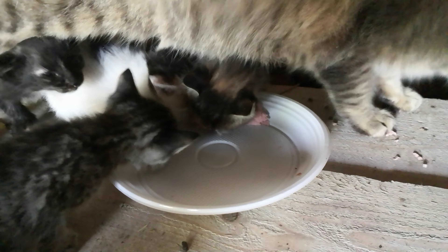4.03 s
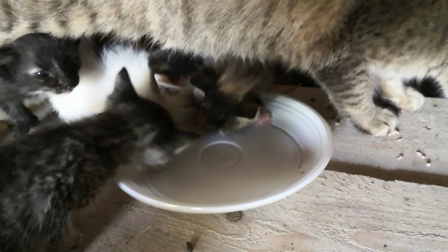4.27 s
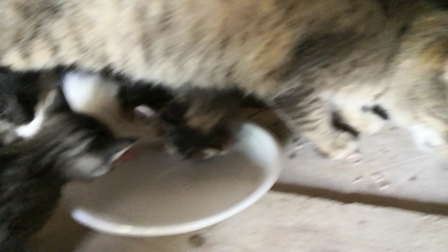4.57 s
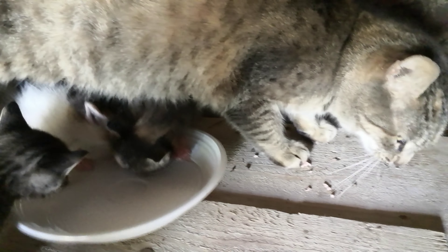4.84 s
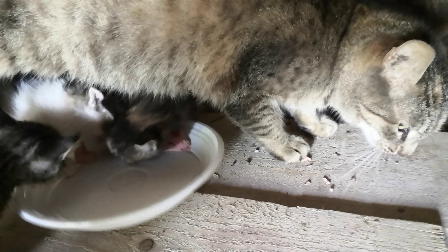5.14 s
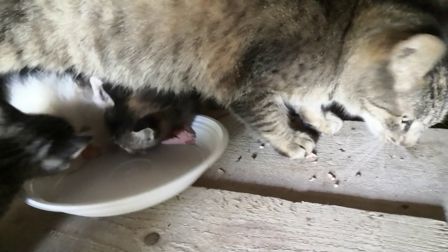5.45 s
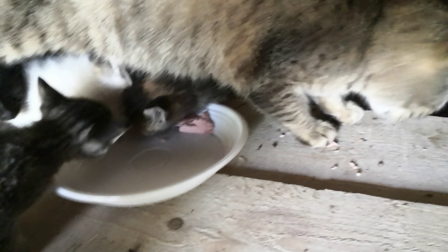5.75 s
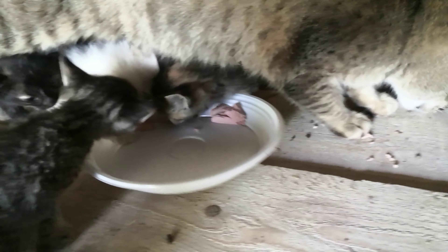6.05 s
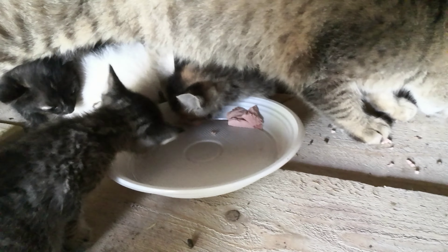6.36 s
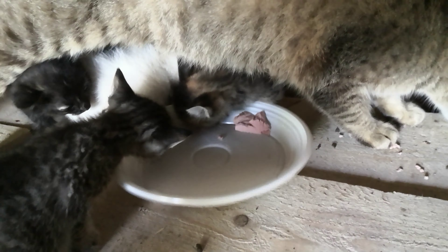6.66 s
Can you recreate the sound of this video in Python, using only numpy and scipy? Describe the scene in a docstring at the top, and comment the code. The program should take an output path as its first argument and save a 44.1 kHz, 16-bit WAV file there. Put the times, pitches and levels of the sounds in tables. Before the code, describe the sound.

Cats eat with wet smacks and clicking bites, then a plastic plate scuffs on wood as a kitten meows twice, loudly then softly.

```python
"""Kittens and their mother feed from a thin plastic plate on a plank floor, close by and a little to the
right. Over faint room noise, lips smack, wet bites click and paws set the boards ringing. A faint tone
hangs for a second. After 4 s the plate is shoved over the wood, knocking and scuffing by friction.
Meanwhile a kitten gives a loud high meow, then a softer, raspy rising one follows: harmonics of the
vocal folds, shaped by throat and mouth. A few last smacks and bites close the scene."""
import sys
import numpy as np
from scipy import signal
from scipy.fft import rfft, irfft, next_fast_len
from scipy.io import wavfile
from scipy.ndimage import uniform_filter1d

SR = 44100
rng = np.random.default_rng(int(sys.argv[2]) if len(sys.argv) > 2 else 0)


def transcribe(u):
    """Save the signal u as a 16-bit wav file named by the first command-line argument.

    u: samples, shape (n,) or (channels, n), limited to [-1, 1]; the rate is SR.
    q: integer samples, one column per channel.
    """
    v = np.clip(np.atleast_2d(u).T, -1, 1)
    q = np.round(v * 32767).astype(np.int16)
    wavfile.write(sys.argv[1], SR, q)


N = 300321
TIME = np.arange(N) / SR

# Levels in the tables are relative: each source's gain is applied afterwards.
# spectrum of the room's still air: f/Hz, level/dB
AIR_SPECTRUM = [(41, -19.5), (70, 3), (113, -7.5), (151, -4.5), (237, -9), (390, -16), (627, -24),
                (1100, -15.5), (1210, -19), (1620, -14), (4180, -22.5), (4790, -26), (6870, -24),
                (7870, -33.5), (15500, -37)]
# its left-right coherence: f/Hz, coherence (clipped to 0-0.999 in use)
AIR_COHERENCE = [(60, 0.89), (180, 0.97), (550, -2.5), (1650, 0.46), (4970, -0.037), (15000, 0.13)]
# its balance, left minus right: f/Hz, level/dB
AIR_BALANCE = [(180, 0.5), (550, 2), (1650, 0), (5000, -1.5), (15000, -1.5)]
# low background rumble, swelling briefly near 4.7 s: t/s, level/dB
RUMBLE_ENVELOPE = [(0.0, -59.5), (4.2, -61), (4.74, -53), (5.1, -58.5), (6.81, -57)]
# spectra of rumble, bite, chewing, plate scuff and vocal rasp: f/Hz, level/dB
RUMBLE_SPECTRUM = [(12, -24.5), (28, -11.5), (40, 2.5), (52, -14), (78, -7), (110, -17.5), (220, -37.5),
                   (1000, -56)]
BITE_SPECTRUM = [(150, -6.5), (600, -23.5), (1150, -21), (1700, 6.5), (2500, 4), (3400, 4), (4500, 6),
                 (6200, 1), (7300, 6.5), (8000, -2.5), (9200, -34.5), (11500, -13.5), (15000, -33.5)]
CHEW_SPECTRUM = [(300, -34), (700, -22), (1200, -14), (1750, -1.5), (2700, 6.5), (3700, -5), (4700, -1),
                 (6300, -9.5), (7400, 2), (8600, -24.5), (11000, -29), (15000, -34)]
SCUFF_SPECTRUM = [(300, -23.5), (600, -36), (1100, -14), (1400, -8), (1700, -1), (2250, 1.5), (3300, -6.5),
                  (4500, -13), (6000, -12), (7600, -9), (8400, -54), (10000, -47.5), (11500, -37.5),
                  (15000, -41)]
RASP_SPECTRUM = [(1500, -22), (4000, -14.5), (4700, -9), (5500, 3), (6100, -1), (7200, 2.5), (8000, -24),
                 (9000, -36.5), (15000, -35)]
# lip and tongue smacks; knocks of the plate on the boards: t/s, peak level/dB, centre f/Hz
LIP_SMACKS = [(0.434, -52, 5000), (0.494, -46, 7300), (0.505, -49, 7600), (1.149, -53, 3100),
              (1.345, -44.5, 3500), (1.8665, -38.5, 4600), (2.276, -39, 3460), (2.531, -37.5, 6960),
              (3.0945, -38.5, 5460), (3.143, -48.5, 4700), (3.1995, -41, 4400), (3.395, -53, 5030),
              (3.312, -42, 2280), (3.485, -43.5, 7100), (3.798, -46.5, 5500), (4.131, -45, 7000),
              (4.1346, -37, 7150), (4.188, -50.5, 7340), (4.266, -49.5, 5530), (4.4014, -44.5, 4540),
              (4.9178, -46.5, 7700), (5.9941, -37.5, 5550), (6.222, -52.5, 7000), (6.2395, -42.5, 4190),
              (6.315, -43.5, 5700), (6.328, -49.5, 6460)]
PLATE_KNOCKS = [(4.2246, -36.5, 1340), (4.303, -45, 740), (4.541, -37, 1520), (5.163, -41.5, 1810),
                (5.252, -49, 2000), (5.881, -47, 1380), (6.047, -52.5, 1198), (6.204, -56, 1740)]
# bites, each a snap and a wet squelch: t/s, snap level/dB, centre f/Hz, squelch level/dB
BITES = [(0.7188, -28.5, 4730, -53.5), (0.807, -50, 3000, -53.5), (0.825, -18, 5000, -46),
         (1.499, -38.5, 3200, -85), (1.5292, -41.5, 3750, -79), (1.5736, -48, 2970, -64),
         (1.608, -60, 3000, -61), (1.706, -38.5, 8500, -57.5), (1.802, -41.5, 2910, -60),
         (1.876, -35, 3000, -55.5), (1.954, -48, 1770, -64.5), (2.1099, -20, 6400, -88),
         (2.1238, -26.5, 6800, -51.5), (2.14, -39, 3040, -64), (2.1857, -41, 2330, -53),
         (2.199, -43, 3000, -56), (2.476, -46, 2600, -65.5), (2.5589, -20.5, 3700, -45),
         (2.573, -29, 1680, -68), (2.61, -33, 5190, -61), (2.807, -43.5, 4820, -68.5),
         (3.895, -40, 3200, -92), (3.94, -60, 3500, -62.5), (4.4255, -44.5, 2320, -57.5),
         (5.8412, -42, 3120, -52.5), (6.7068, -49, 2360, -66)]
# paws landing on the planks: t/s, level/dB
FOOTFALLS = [(0.722, -47), (3.038, -41.5), (3.056, -43.5), (3.24, -61.5), (4.227, -57), (4.302, -48),
             (4.369, -58.5), (4.591, -56), (4.632, -53)]
# normal modes of a plank: f/Hz, level/dB, T60/s
PLANK_MODES = [(133, -7.5, 0.087), (187, -3, 0.18), (243, -3, 0.15), (327, -6.5, 0.11), (390, -10.5, 0.11),
               (567, -26, 0.29), (652, -14.5, 0.037)]
# strokes of chewing, of the plate on wood, of the voice catching: t/s, level/dB, half length/s
CHEW_STROKES = [(1.38, -68.5, 0.081), (2.23, -63.5, 0.034), (3.35, -75.5, 0.1), (6.645, -62, 0.0089)]
PLATE_SCUFFS = [(4.315, -67, 0.052), (4.543, -46, 0.016), (4.6, -53.5, .005), (4.692, -53.5, 0.029),
                (4.838, -47, 0.012), (4.868, -56, 0.011), (4.975, -47.5, 0.0095), (4.997, -47, 0.0055),
                (5.072, -44.5, 0.0069), (5.12, -65, 0.032), (5.33, -61, 0.0094), (5.668, -50.5, 0.0059),
                (5.697, -46.5, 0.0079), (5.81, -43, 0.0092), (6.05, -68.5, 0.017)]
VOICE_RASPS = [(5.471, -54, 0.0065), (5.52, -56, .012), (5.5645, -51, .002), (5.591, -53, 0.0054)]
# fundamental of the loud and of the soft meow: t/s, f/Hz
LOUD_PITCH = [(4.48, 987), (4.497, 903), (4.532, 1162), (4.56, 1213), (4.63, 1247), (4.657, 1175),
              (4.69, 1096), (4.71, 1128), (4.76, 1102), (4.875, 1327), (4.99, 1139), (5.03, 1010)]
SOFT_PITCH = [(5.465, 625), (5.55, 586.6), (5.73, 728.6), (5.825, 803), (5.87, 764), (5.965, 832),
              (6.015, 904), (6.08, 926), (6.105, 990), (6.125, 705), (6.165, 675)]
# the mouth opens wide and closes (loud meow) or closes slowly (soft meow):
# t/s, resonance f/Hz, mouth level/dB, overtone level/dB, hoarseness (0 is clear)
LOUD_MOUTH = [(4.48, 3500, -51.5, -71, 0.8), (4.497, 3220, -39.5, -62.5, 1.1),
              (4.534, 2900, -31, -52.5, 0.72), (4.56, 3000, -21, -52.5, 0.12), (4.63, 3160, -21, -45, 0.25),
              (4.661, 2500, -27.5, -50, 0), (4.694, 2000, -22, -51, 0.3), (4.706, 2070, -36, -63.5, 0.2),
              (4.752, 2050, -43, -70, 0.41), (4.82, 2100, -64, -98.5, 0.47), (5.03, 2210, -63, -100, .3)]
SOFT_MOUTH = [(5.46, 3400, -85, -67, 1.08), (5.56, 3500, -86, -65, 0.56), (5.75, 3560, -61.5, -65, 0.37),
              (5.83, 3030, -53, -63, 0.65), (5.87, 2900, -43.5, -69, 0.55), (5.9, 2510, -60, -70.5, 0.2),
              (5.966, 2155, -49, -80, 0.19), (6.02, 1810, -70, -86, 0.56), (6.1, 1790, -67, -105, 0.58),
              (6.165, 1895, -67, -95, 0.56)]
# closed-mouth resonances, a hum throughout each meow: f/Hz, harmonic level/dB
LOUD_HUM = [(900, -63.5), (1110, -49.5), (1220, -51.5), (1330, -49), (1800, -45.5), (2000, -56.5),
            (2200, -57), (2500, -65.5), (3600, -84), (5000, -90), (9000, -120)]
SOFT_HUM = [(600, -68), (750, -63), (920, -54), (1200, -84), (1500, -72), (1850, -68.5), (2300, -62),
            (2800, -68.5), (3700, -85), (4600, -71), (5500, -102), (9000, -110)]
# throat resonances that shape the high overtones: f/Hz, level/dB
LOUD_THROAT = [(3400, -7.5), (4000, 5.5), (4550, 10), (4950, 17), (5500, 0.5), (6600, -1), (7600, -4.5),
               (8200, -10.5), (9000, -60), (14000, -48)]
SOFT_THROAT = [(3000, -33), (4100, -19), (4650, 9.5), (5000, 5), (5500, 7), (6200, 2.5), (7300, 4.5),
               (8100, -7), (9000, -62), (11000, -14.5), (14000, -37)]


def from_db(db):
    """Amplitude grows tenfold for every 20 dB."""
    return 10 ** (np.asarray(db) / 20)


def unit_rms(x):
    """Normalisation to unit mean power."""
    return x / np.sqrt(np.mean(x ** 2) + 1e-20)


def at_hz(points, hz):
    """Interpolation on a logarithmic frequency axis."""
    f, value = np.transpose(points)
    return np.interp(np.log(np.maximum(hz, 1)), np.log(f), value)


def coloured(x, spectrum):
    """Minimum-phase filtering: folding the cepstrum makes a response (f/Hz, level/dB) causal."""
    size = 2 * next_fast_len(x.shape[-1] // 2 + 2048)
    cepstrum = irfft(np.log(from_db(at_hz(spectrum, np.fft.rfftfreq(size, 1 / SR)))))
    cepstrum[1:size // 2] *= 2
    cepstrum[size // 2 + 1:] = 0
    return irfft(rfft(x, size) * np.exp(rfft(cepstrum)))[..., :x.shape[-1]]


def drift(corner_hz):
    """Low-passed noise: a smooth random fluctuation of unit RMS."""
    hz = np.fft.rfftfreq(N, 1 / SR)
    return unit_rms(irfft(rfft(rng.standard_normal(N)) / (1 + (hz / corner_hz) ** 4), N))


def glide(curve):
    """Interpolation of each column over time; a moving average rounds the corners."""
    times, *columns = np.transpose(curve)
    return [uniform_filter1d(np.interp(TIME, times, column), size=300) for column in columns]


def add(track, start_s, sound):
    """Superposition of a short sound on a track."""
    start = round(start_s * SR)
    track[..., start:start + sound.shape[-1]] += sound[..., :N - start]


def air(hiss_db, rumble_gain_db):
    """Partial coherence: room noise is alike on both sides in the bass, over a wavering rumble."""
    hz = np.fft.rfftfreq(N, 1 / SR)
    mid, side = rfft(rng.standard_normal((2, N)))
    coherence = np.clip(at_hz(AIR_COHERENCE, hz), 0, .999)
    sign = np.array([[1], [-1]])   # left, right
    pair = mid + sign * side * np.sqrt((1 - coherence) / (1 + coherence))
    hiss = irfft(pair * from_db(at_hz(AIR_SPECTRUM, hz) + sign * at_hz(AIR_BALANCE, hz) / 2), N)
    swell = from_db(np.interp(TIME, *np.transpose(RUMBLE_ENVELOPE)) + rumble_gain_db)
    rumble = swell * unit_rms(coloured(rng.standard_normal(N), RUMBLE_SPECTRUM))
    return from_db(hiss_db) * hiss / hiss.mean(axis=0).std() + rumble


def impact(spectrum, t60, ring_share):
    """Impulse response of a damped body: a snap and a dense, decaying ring, with unit peak."""
    t = np.arange(SR // 12) / SR
    snap = ring_share * rng.standard_normal(len(t)) * from_db(-60 * t / t60)
    snap[0] = 1
    click = coloured(snap, spectrum)
    return click / np.abs(click).max()


def pops(events, t60, ring_share, skirt_db):
    """Impulses excite one resonance of mouth or plate, which is skirt_db down an octave away."""
    out = np.zeros(N)
    hz = np.geomspace(200, 16000, 40)
    band_db = at_hz([(500, -24), (1100, -6.0), (7600, 2.5), (8800, -21)], hz)
    for s, peak_db, centre_hz in events:
        octaves = np.abs(np.log2(hz / centre_hz))
        resonance_db = -skirt_db * np.log2(1 + 2 * octaves) / np.log2(3)
        spectrum = np.column_stack([hz, resonance_db + band_db])
        add(out, s + 0.00027, from_db(peak_db) * impact(spectrum, t60, ring_share))
    return out


def nibbles(per_s, level_db, spread_db):
    """A random point process of tiny tongue ticks; rows as in LIP_SMACKS."""
    draws, span_s = rng.random((120, 4)), TIME[-1] - .1
    kept = draws[:, 3] < per_s * span_s / len(draws)
    return [(span_s * when, level_db + spread_db * size ** 2, 2500 * 3 ** pitch)
            for when, size, pitch in draws[kept, :3]]


def bites(events, t60, ring_share, focus_db):
    """Impact excitation: each bite rings mouth and plate briefly, in its own pitch region."""
    out = np.zeros(N)
    for s, peak_db, centre_hz, _ in events:
        spectrum = [(hz, db - focus_db * min(np.log2(hz / centre_hz) ** 2, 2))
                    for hz, db in BITE_SPECTRUM]
        add(out, s + 0.00035, from_db(peak_db) * impact(spectrum, t60, ring_share))
    return out


def crackle(spectrum, grain_db):
    """Fast random amplitude modulation breaks noise into grains; unit RMS."""
    grains = rng.standard_normal(N) * from_db(grain_db * drift(810))
    return unit_rms(coloured(grains, spectrum))


def squelches(events, grain_db, attack_s=0.0059, decay_s=0.016):
    """Exponential growth and decay: the crackle of wet food peaks at each snap and dies away."""
    swell = np.zeros(N)
    for s, _, _, db in events:
        time_constants = np.maximum((s - TIME) / attack_s, (TIME - s) / decay_s)
        swell += from_db(db) * np.exp(-np.minimum(time_constants, 20))
    return swell * crackle(CHEW_SPECTRUM, grain_db)


def paws(scatter_db, pad_share, pad_t60=0.077):
    """Modal vibration: each footfall rings the damped plank modes, with a dull puff from the pad."""
    out, t = np.zeros(N), np.arange(SR // 3) / SR
    pad_spectrum = [(80, 4.5), (300, -1.5), (650, -5.5), (1100, -20), (5000, -73.0)]
    for s, level_db in FOOTFALLS:
        thump = np.zeros(len(t))
        for k, (hz, db, t60) in enumerate(PLANK_MODES):
            decay = from_db(db + scatter_db * rng.normal() - 60 * t / t60)
            thump += (-1) ** k * decay * np.sin(2 * np.pi * hz * t)
        pad = unit_rms(coloured(rng.standard_normal(len(t)), pad_spectrum)) * from_db(-60 * t / pad_t60)
        add(out, s, from_db(level_db) * (thump + pad_share * pad))
    return out


def gnawing(count, start_s, period_s, centre_hz, snap_db, squelch_db, growth_db):
    """A periodic pulse train of small bites, each a little stronger; rows as in BITES."""
    return [(start_s + k * period_s, snap_db + k * growth_db, centre_hz, squelch_db + k * growth_db)
            for k in range(count)]


def friction(strokes, spectrum, grain_db):
    """Stick-slip friction: countless tiny slips merge into noise under strokes that swell and fade."""
    swell = sum(from_db(db) / np.cosh(np.clip(0.91 * (TIME - s) / half_s, -30, 30))
                for s, db, half_s in strokes)
    return swell * crackle(spectrum, grain_db)


def whine(hz, level_db):
    """Random modulation blurs a faint background tone into a narrow band for about a second."""
    swell = np.interp(TIME, [2.1, 2.4, 2.95, 3.2], [0, 1, 1, 0])
    phase = 2 * np.pi * hz * TIME
    return from_db(level_db) * swell * (drift(45) * np.sin(phase) + drift(51) * np.cos(phase))


def meow(pitch_curve, mouth_curve, hum, throat, jitter, shimmer_db, breath_db):
    """Source and filter: vocal-fold harmonics pass through moving mouth, steady throat and hum."""
    mouth_width_oct, hum_release_s, hum_release_db = 0.28, 0.11, -4.5
    start, end = pitch_curve[0][0], pitch_curve[-1][0]
    gate = np.interp(TIME, [start - .004, start + .002, end - .005, end + .01], [0, 1, 1, 0])
    pitch, = glide(pitch_curve)
    mouth_hz, mouth_db, overtones_db, hoarseness = glide(mouth_curve)
    # hoarseness shakes pitch and level and lets air through
    pitch = pitch * (1 + jitter * hoarseness * (drift(90) + drift(500)))
    phase = 2 * np.pi * np.cumsum(pitch) / SR
    on, voice = gate > 0, np.zeros(N)
    release_db = hum_release_db * np.clip(1 - (end - TIME[on]) / hum_release_s, 0, 1)
    for k in range(1, 18):
        hz = k * pitch[on]
        mouth = from_db(mouth_db[on]) * np.exp(-.5 * (np.log2(hz / mouth_hz[on]) / mouth_width_oct) ** 2)
        overtone = from_db(overtones_db[on] + at_hz(throat, hz))
        nasal = from_db(at_hz(hum, hz) + release_db)
        voice[on] += np.sqrt(2 * (mouth ** 2 + overtone ** 2 + nasal ** 2)) * np.sin(k * phase[on])
    # air escapes in puffs, once a cycle, as strongly as the folds are driven
    effort = np.hypot(from_db(mouth_db), from_db(overtones_db))
    breath_spectrum = [(600, -27), (1500, -23), (2400, 0.5), (3800, -2), (5000, -4.5), (7500, -4.5),
                       (9000, -37)]
    puffs = unit_rms(coloured(rng.standard_normal(N) * (1 + np.cos(phase)), breath_spectrum))
    breath = from_db(breath_db) * hoarseness * effort * puffs
    shimmer = from_db(shimmer_db * hoarseness * drift(97))
    return gate * (voice * shimmer + breath)


def from_right(x, shadow_db, corner_hz, lag_ms, scatter_db):
    """Acoustic shadow: the left side hears later, duller and partly by way of plate and boards."""
    paths = rng.standard_normal(SR // 300) * np.linspace(1, 0, SR // 300)
    scattered = from_db(scatter_db) * signal.fftconvolve(x, paths / np.linalg.norm(paths))[:N]
    shadow = [(corner_hz / 2, -1), (corner_hz, -shadow_db), (7000, -shadow_db), (12000, -shadow_db / 2)]
    left = np.interp(TIME - lag_ms / 1000, TIME, coloured(x + scattered, shadow))
    return np.array([left, x])


def room(x, t60, wet_db):
    """Diffuse reverberation: an exponentially decaying tail, independent on each side."""
    t = np.arange(SR // 2) / SR
    tail = rng.standard_normal((2, len(t))) * from_db(-60 * t / t60) * (t > .003)
    tail /= np.sqrt(np.sum(tail ** 2, axis=1, keepdims=True))
    return from_db(wet_db) * signal.fftconvolve(x[None], tail, axes=1)[:, :N]


def scene():
    """Superposition: eating, plate and meows from the right, thumps centred, room and air all round."""
    loud_meow = meow(LOUD_PITCH, LOUD_MOUTH, LOUD_HUM, LOUD_THROAT,
                     jitter=0.013, shimmer_db=4.5, breath_db=-12.5)
    soft_meow = meow(SOFT_PITCH, SOFT_MOUTH, SOFT_HUM, SOFT_THROAT,
                     jitter=0.026, shimmer_db=4.5, breath_db=-10)
    mouthfuls = list(BITES) + gnawing(count=5, start_s=1.2107, period_s=0.0635, centre_hz=3140,
                                      snap_db=-50, squelch_db=-65, growth_db=0.5)
    eating = from_db(6) * bites(mouthfuls, t60=0.021, ring_share=0.16, focus_db=2.5)
    eating += from_db(7.5) * squelches(mouthfuls, grain_db=2.5)
    eating += from_db(5.5) * pops(LIP_SMACKS, t60=0.01, ring_share=0.12, skirt_db=23.5)
    ticks = nibbles(per_s=4, level_db=-48.5, spread_db=7.5)
    eating += pops(ticks, t60=0.015, ring_share=0.13, skirt_db=9)
    eating += from_db(7.5) * friction(CHEW_STROKES, CHEW_SPECTRUM, grain_db=14.5)
    plate = from_db(5.5) * friction(PLATE_SCUFFS, SCUFF_SPECTRUM, grain_db=1.5)
    plate += from_db(4) * pops(PLATE_KNOCKS, t60=0.086, ring_share=0.11, skirt_db=17)
    rasp = from_db(9.5) * friction(VOICE_RASPS, RASP_SPECTRUM, grain_db=5.5)
    steps = paws(scatter_db=3.5, pad_share=0.11)
    direct = from_right(loud_meow, shadow_db=10, corner_hz=2470, lag_ms=0.02, scatter_db=-4.5)
    direct += from_right(eating, shadow_db=14.5, corner_hz=2580, lag_ms=0.07, scatter_db=-7)
    direct += from_right(soft_meow + rasp, shadow_db=9.5, corner_hz=650, lag_ms=0.58, scatter_db=-6)
    direct += from_right(plate, shadow_db=9.5, corner_hz=1520, lag_ms=0.06, scatter_db=-2.5)
    reverb = room(eating + plate + rasp, t60=0.3, wet_db=-24) + room(steps, t60=0.1, wet_db=-4)
    reverb += room(loud_meow + soft_meow, t60=0.28, wet_db=-20)
    background = whine(hz=1126, level_db=-80.5) + air(hiss_db=-70.5, rumble_gain_db=-10)
    return direct + steps + reverb + background


def record(dry):
    """Band limiting: an elliptic low-pass cuts the highest treble steeply."""
    cutoff_hz = 15900
    return signal.sosfilt(signal.ellip(10, .1, 70, cutoff_hz, fs=SR, output="sos"), dry)


dry = scene()
out = record(dry)
transcribe(out)
```